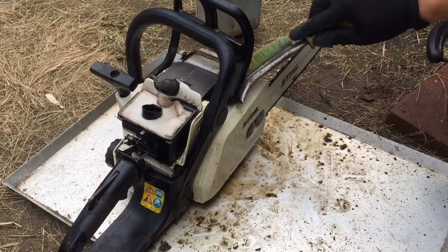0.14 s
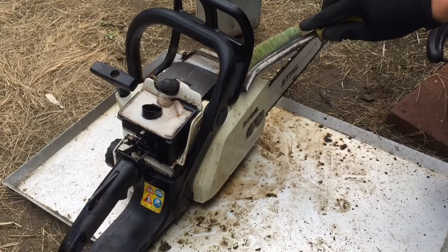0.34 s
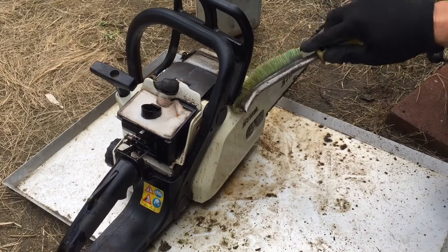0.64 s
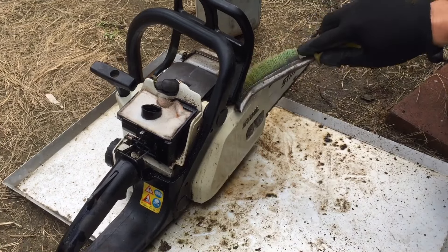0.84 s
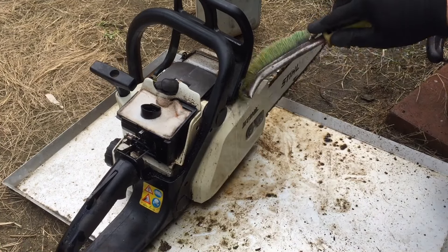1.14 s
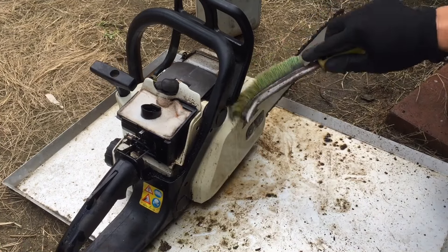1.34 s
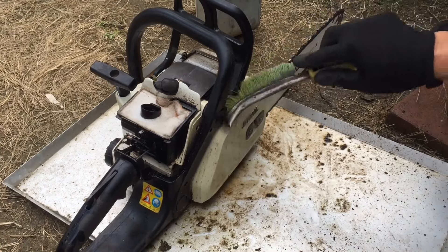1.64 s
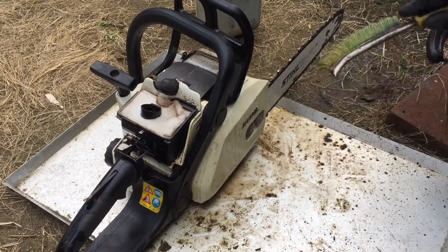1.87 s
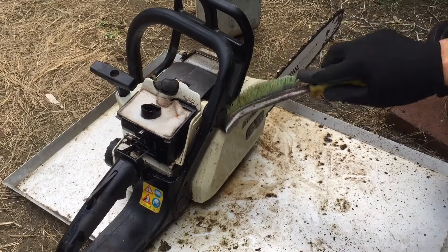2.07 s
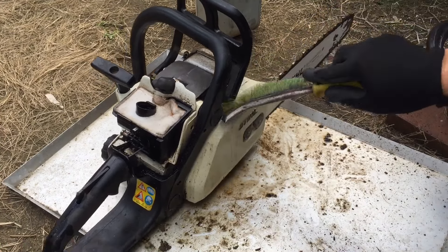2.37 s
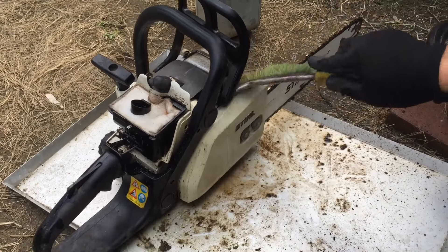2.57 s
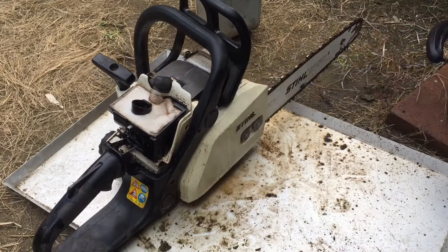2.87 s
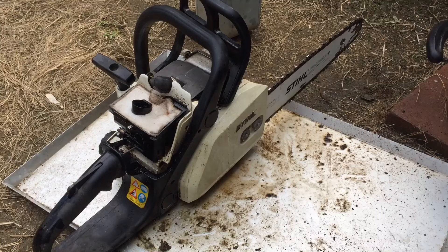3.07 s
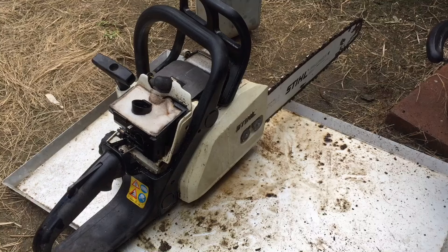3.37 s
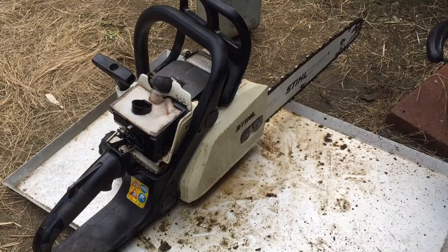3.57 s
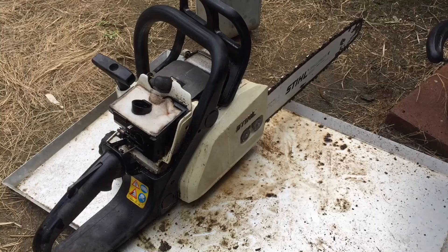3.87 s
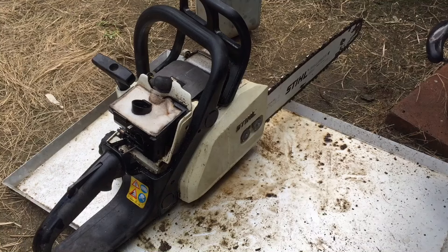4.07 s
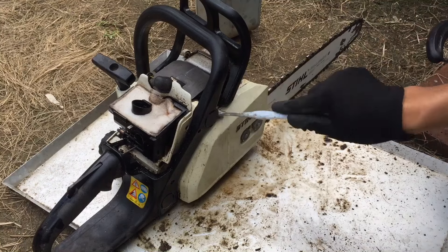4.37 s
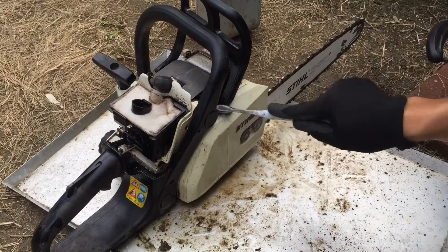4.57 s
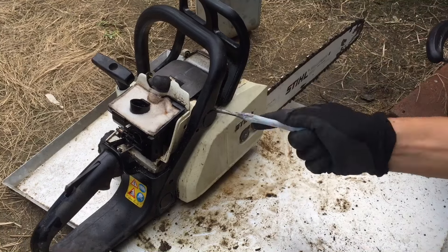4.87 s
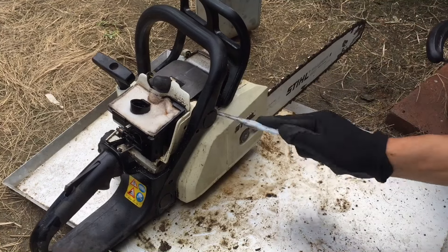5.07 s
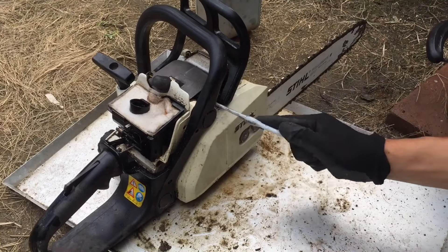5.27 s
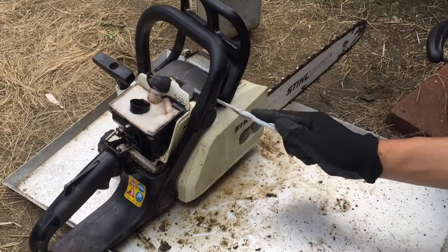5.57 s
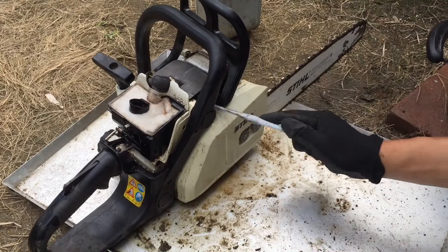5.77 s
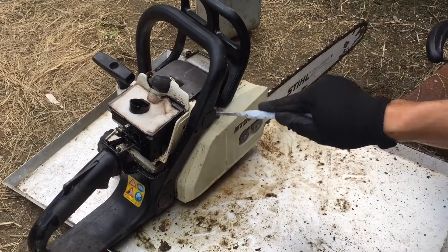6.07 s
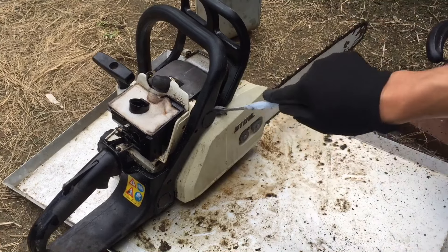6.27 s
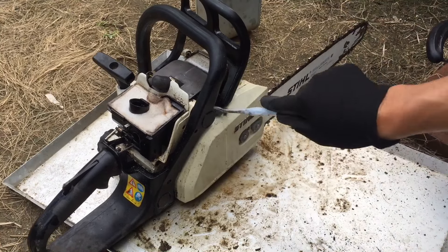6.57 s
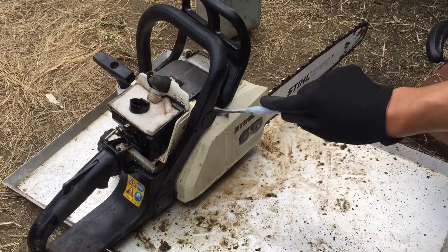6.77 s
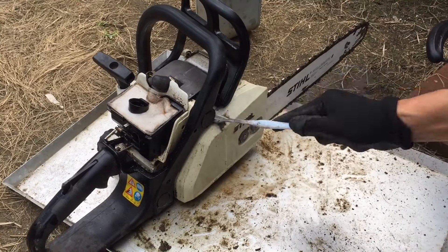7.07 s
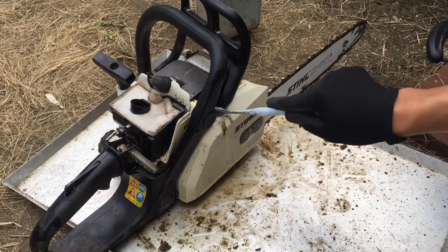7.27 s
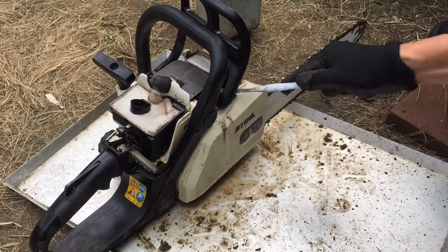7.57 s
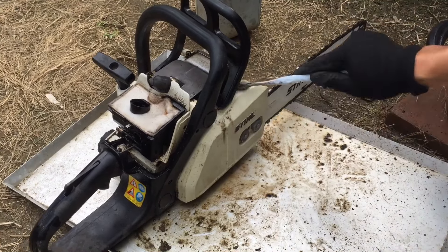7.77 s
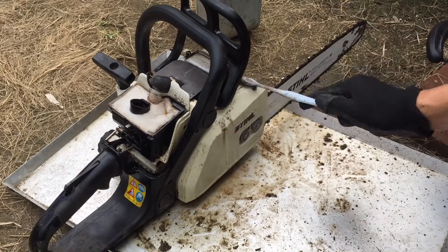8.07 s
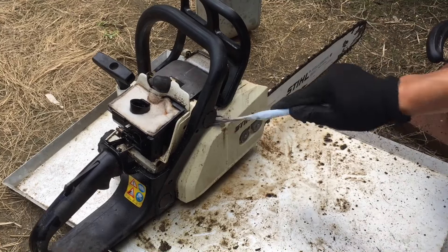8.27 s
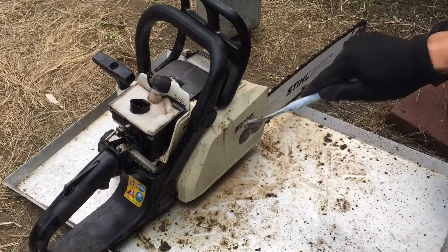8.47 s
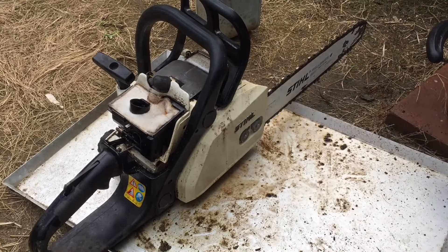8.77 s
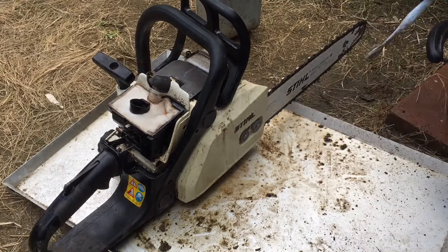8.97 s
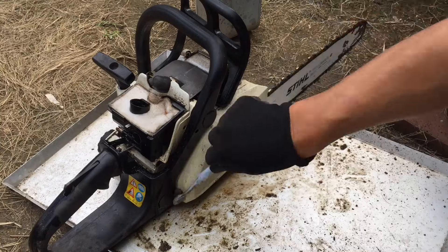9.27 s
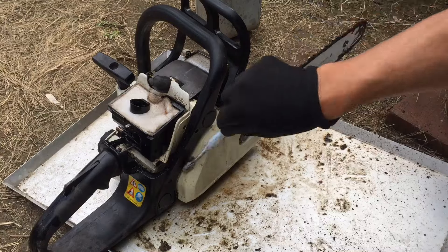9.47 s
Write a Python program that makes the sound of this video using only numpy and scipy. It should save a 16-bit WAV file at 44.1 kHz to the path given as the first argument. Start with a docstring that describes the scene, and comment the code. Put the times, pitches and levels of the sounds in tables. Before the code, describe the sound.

A stiff brush scrubs a hollow plastic cover in quick strokes, is put down with a clack, then a smaller brush scratches and clinks on steel.

```python
"""Two brushes scrub the side cover and bar root of a stopped chainsaw, over quiet air and a faint far drone.
At first one brush swishes to and fro, around 15 sweeps a second: showers of clicks excite the cover's modes.
Its head knocks on the hollow plastic, with a small squeak and soft low bumps; then it is put down with a clack.
The second, smaller brush then scrubs, squeaks and clinks on steel: blows are decaying modes and a noise crack.
The clinks cease, and scrubbing, knocks and bumps go on to the end, with one more clack."""
import sys
import numpy as np
from scipy import signal
from scipy.fft import rfft, irfft, next_fast_len
from scipy.io import wavfile
from scipy.ndimage import uniform_filter1d

SR = 44100
rng = np.random.default_rng(int(sys.argv[2]) if len(sys.argv) > 2 else 0)


def dump(signal):
    """Clip the signal to [-1, 1] and save it as 16-bit WAV at the path in sys.argv[1]."""
    limited = np.clip(np.atleast_2d(signal).T, -1, 1)
    pcm = np.round(limited * 32767).astype(np.int16)
    wavfile.write(sys.argv[1], SR, pcm)


N = 424683  # length in samples

# Outdoor air. Each row: frequency in Hz, relative spectral level in dB.
AIR_SPECTRUM = [(25, -48), (45, -40), (75, -17.5), (130, -6), (200, -14), (330, -21.5), (700, -25.5),
                (1800, -27.5), (4000, -31.5), (9000, -34.5), (15500, -39)]
AIR_DB = -67
# Far drone. Each row: mean frequency in Hz, mean level in dB.
DRONE = [(113, -82), (140, -70.5)]
# Brush head on the cover. Each row: start in seconds, level in dB, hollow bass and sharp tick in dB
# relative to that level.
KNOCKS = [(0.046, -31, -12, -20), (0.0566, -34.5, -24, -12), (0.0693, -36, -32, -8), (0.0846, -28, -7, -12),
          (0.2156, -44, -13, -12), (0.4693, -34, -11, -3), (0.5181, -43, 1, -3), (0.8802, -42, -1, -7.5),
          (0.9028, -39.5, 5, -9.5), (1.2715, -31.5, 1.5, -9), (1.409, -43.5, -12.5, -6),
          (2.1763, -42.5, 3, -21), (2.2115, -42, -5.5, -10), (2.3958, -36.5, -16, -2.5),
          (2.6357, -30, -11, -17.5), (2.6565, -32.5, -2, -24), (2.7036, -38.5, -5, -10.5),
          (2.7197, -27.5, -11, -9), (2.7372, -38.5, -11, -11), (4.5385, -47, -27, -4),
          (4.5794, -44, -19, -10), (4.591, -43.5, -21, -0.5), (4.6042, -40, -5.5, 3),
          (4.621, -47.5, -5, -28), (4.6638, -41.5, -35, -1), (4.755, -45, -6.5, -8),
          (4.885, -43.5, -17, -6.5), (4.9673, -48.5, -27, -14), (5.331, -54, -22, -18),
          (5.4385, -36, -6, -7), (5.539, -54, -24, -8), (5.7914, -49.5, 7, -2), (5.8512, -43, -37, 1.5),
          (5.9182, -38, -14, -0.5), (6.0258, -50.5, -6, -30), (6.0543, -42.5, -44, -3),
          (6.1384, -52.5, -17, 5.5), (6.2046, -40, -45, -3.5), (6.7372, -40, -7.5, -34),
          (6.8259, -38, -26, -3), (6.8782, -48.5, 1, -23), (7.1518, -44.5, -2.5, -27),
          (7.22, -34, -12, 1.5), (7.2519, -51.5, -32, 16), (7.4113, -53, 9, 3),
          (7.5146, -26.5, -16.5, -7.5), (7.5426, -38, -24, -3), (7.7365, -34.5, -35, -10),
          (7.806, -47.5, -27, -27), (7.836, -43, -8.5, -4), (8.0271, -40, -8.5, 1),
          (8.1012, -54, -28.5, 7.5), (8.1608, -62, -8, 12.5), (8.521, -45.5, 8.5, 4.5)]
# Modes of the plastic cover. Each row: frequency in Hz, mean strength in dB, time to fall 60 dB in seconds.
COVER_MODES = [(667, -16, 0.067), (1012, -5, 0.028), (1052, 5, 0.039), (1150, -11.5, 0.02215),
               (1648, 2, 0.04), (1800, 7, 0.026), (1916, -2, 0.043), (2064, 4.5, 0.033), (2180, -5.5, .025),
               (2472, 0, 0.05), (2947, -3.5, 0.036), (3314, -2.5, 0.039), (3756, -0.5, 0.017),
               (4240, -7.5, 0.036), (4960, -11, 0.024), (5890, -20.5, 0.065), (6950, -21, 0.016)]
# Dense crack of a blow on the cover. Each row: frequency in Hz, relative spectral level in dB.
COVER_CRACK = [(100, -36), (400, -24), (750, -17), (1050, 11), (1400, -1.5), (1900, 6), (3200, -2.5),
               (5500, -10.5), (8000, -17), (12000, -19.5), (16000, -21.5)]
# Bouts of even scrubbing. Each row: start in seconds, end in seconds, number of sweeps, share of each sweep
# in contact, pressure on the cover at the start in dB, the same at the end in dB, bristle hiss in dB.
SCRUBS = [(0.102, 0.298, 3, 0.57, -49, -52, -48.5), (0.301, 0.402, 2, 0.51, -59.5, -64, -54.5),
          (0.489, 0.732, 3, 0.49, -45, -58.5, -51.5), (0.81, 0.914, 2, 0.62, -65.5, -57.5, -57.5),
          (0.94, 1.143, 4, 0.45, -48.5, -65, -48), (1.222, 1.562, 7, 0.58, -61, -60.5, -54.5),
          (1.569, 1.74, 2, 0.26, -76, -60, -53.5), (1.754, 1.838, 1, .38, -56.5, -56.5, -41.5),
          (2.13, 2.303, 2, 0.62, -66.5, -38, -54), (2.339, 2.48, 3, 0.93, -47.5, -57, -60),
          (2.507, 2.66, 3, 1, -42, -68, -55.5), (4.447, 4.764, 5, 0.58, -56, -54, -63.5),
          (4.77, 4.89, 2, .7, -62, -66, -63), (4.904, 5.111, 3, 0.55, -52.5, -69.5, -62),
          (5.255, 5.315, 1, .55, -57, -57, -53), (5.637, 5.791, 3, .8, -66, -62.5, -61.5),
          (6.032, 6.377, 5, 0.72, -68.5, -53, -62), (6.434, 6.937, 7, 0.52, -55, -44, -53),
          (6.947, 7.215, 4, .5, -44, -49.5, -54), (7.215, 7.43, 3, .85, -53, -52, -56.5),
          (7.435, 7.53, 2, .7, -44, -44, -51), (7.644, 8.025, 6, 0.53, -55.5, -47.5, -59),
          (8.169, 8.253, 1, 0.36, -63, -66, -61.5), (8.323, 8.457, 3, 0.58, -60, -62, -78),
          (8.476, 8.56, 2, 0.57, -45.5, -44, -57), (8.866, 8.936, 1, 0.43, -50.5, -47, -50.5),
          (9.239, 9.369, 3, 0.98, -69.5, -46, -45), (9.412, 9.563, 3, 1, -53, -60, -43.5),
          (9.569, 9.62, 1, 0.49, -67, -67, -46.5)]
# Broad rasp of bristles on the cover. Each row: frequency in Hz, relative spectral level in dB.
RASP_SPECTRUM = [(200, -32.5), (500, -20), (800, -13), (1050, 8), (1420, -11), (1900, -2.5), (2700, -17),
                 (3500, -10), (5000, -12), (8000, -26.5)]
# The bristles' own hiss. Each row: frequency in Hz, relative spectral level in dB.
HISS_SPECTRUM = [(1500, -38), (3000, -3.5), (4200, 2), (5600, 0.5), (7000, 3.5), (9000, 2), (11000, 4.5),
                 (12800, 3.5), (14200, 2), (15600, 2.5), (16200, -28.5)]
# Squeaks under the dragged brush. Each row: start in seconds, end in seconds, mean pitch in Hz, level in dB.
SQUEAKS = [(5.675, 5.735, 6250, -54), (5.678, 5.74, 2450, -55), (5.644, 5.658, 3500, -52.5),
           (.485, 0.613, 770, -63)]
# Dull bumps while the hand moves. Each row: middle in seconds, length in seconds, level in dB.
BUMPS = [(0.854, 0.043, -56.5), (1.269, 0.022, -44.5), (1.681, 0.013, -36), (2.145, 0.12, -46.5),
         (2.325, 0.092, -47), (3.084, 0.039, -60), (4.658, 0.078, -51), (5.008, 0.031, -53.5),
         (5.141, 0.033, -54.5), (7.266, 0.029, -57), (8.417, 0.031, -51.5), (9.1, 0.025, -57),
         (9.205, 0.021, -52), (9.463, 0.026, -49), (9.557, 0.02, -49)]
# Low thud of a bump. Each row: frequency in Hz, relative spectral level in dB.
THUD_SPECTRUM = [(30, -36), (60, -14), (110, 6.5), (180, -1), (320, -16), (500, -41), (1500, -62.5)]
# Tools put down, picked up and nudged. Each row: start in seconds, level in dB, treble in dB relative to it,
# number of bounces (rounded in use).
CLACKS = [(2.9031, -36, 4, 0), (3.0485, -61, 14, 0), (3.081, -37.5, 2, 5.5), (3.334, -58, -9, 0),
          (3.3937, -59, 2, 1), (3.7114, -67.5, 5, 0), (3.9034, -49, -8, 0.5), (3.9364, -41, -0.5, 1),
          (8.689, -62.5, -12, 0), (9.0003, -41.5, 7, 0)]
# Modes of the tools and what they lie on. Each row: frequency in Hz, mean strength in dB,
# time to fall 60 dB in seconds.
TOOL_MODES = [(362, -12, 0.14), (457, -21.5, 0.049), (669, -2, 0.075), (735, -10.5, 0.098),
              (1050, -5.5, 0.075), (1424, -0.5, 0.079), (1620, 4, 0.035), (1940, 7, 0.031),
              (2810, -3, 0.067), (4550, 2.5, 0.039), (5460, -3.5, 0.075), (6980, 2.5, 0.052),
              (8500, -14, .05), (11800, -1, 0.037), (14100, -13, 0.037)]
# Dense crack of tools in contact. Each row: frequency in Hz, relative spectral level in dB.
TOOL_CRACK = [(120, -37), (350, 4.5), (800, 3.5), (1700, -4), (2400, -3.5), (5000, 2), (9000, 0),
              (13000, 4.5), (16500, -11)]
# Spells of loose grit and light touches while the brushes are changed and the small one is poked about.
# Each row: middle in seconds, length in seconds, level in dB before the common gain in fumbling().
FUMBLES = [(3.16, 0.23, -63.5), (3.65, .45, -69.5), (4.653, 0.38, -56.5), (5.15, 0.42, -59),
           (5.972, 0.4, -60), (8.68, 0.24, -87.5)]
# Small brush on steel. Each row: start in seconds, level in dB, treble in dB relative to it,
# pitch as a factor (below 1 while the brush stays pressed on).
CLINKS = [(4.3919, -46, -5, 0.99), (5.0079, -35, 3.5, 0.96), (5.0225, -41.5, -1, 0.94),
          (5.1168, -26, 7.5, .96), (5.1197, -33, 6, 0.97), (5.2062, -33.5, -2, .92),
          (5.3411, -62, 15.5, .92), (5.3948, -37.5, 5.5, .9), (5.4299, -30, 5, 0.88),
          (5.4385, -29, 5, 0.99), (5.780, -35, 3.5, 0.79), (5.786, -28, 3.5, 0.87), (5.7913, -28, 11.5, 1),
          (5.8496, -39, -6, .89), (5.9067, -28, 0.5, 0.99)]
# Modes of the steel, before that pitch factor. Each row: frequency in Hz, mean strength in dB,
# time to fall 60 dB in seconds.
STEEL_MODES = [(4320, -19, 0.036), (6000, -16, .04), (6560, -13.5, 0.03), (7250, -2.5, 0.048),
               (10100, -16, 0.043), (11100, -16, .04), (12200, -14.5, 0.059), (12330, -9.5, .035),
               (12190, -11.5, 0.037), (12800, -10, .035), (12830, 7.5, 0.02), (12500, -10.5, .04),
               (14420, -22, .05)]
# Dense crack of a blow on steel. Each row: frequency in Hz, relative spectral level in dB.
STEEL_CRACK = [(200, -36), (900, -22.5), (1800, -11), (4000, -10.5), (6500, -10), (8200, -9), (12500, 3),
               (14500, -10.5), (16500, -11)]
# Sound scattered back outdoors. Each row: frequency in Hz, relative spectral level in dB.
SCATTER_SPECTRUM = [(200, 4.5), (2500, 4.5), (8000, -6), (16000, -8.5)]

CATCH_SHARE = 0.37  # chance that the brush catches on an edge in a sweep and taps the cover
CATCH_DB, CATCH_SPREAD_DB = 2, 7  # mean level of a tap over the pressure of its sweep; greatest deviation
CATCH_BASS_DB, CATCH_TICK_DB = -7.5, -11  # hollow bass and sharp tick of a tap, relative
STUTTER_DB, STUTTER_PER_S = 4, 100  # stick-slip makes the pressure within a sweep uneven
DRAG_DB = -17  # light dragging while the hand turns between sweeps
BOUNCE_S, BOUNCE_SHRINK = .058, .56  # first hop in seconds; each later hop as a share of the one before
LANDING_DB, BOUNCE_DB, BOUNCE_TREBLE_DB = -11.5, -2, -7.5  # loss at bounces, more per hop, change of treble
EDGE_HZ = 16300  # upper band limit


def amp(db):
    """Level: decibels to amplitude gain."""
    return 10 ** (np.asarray(db) / 20)


def unit(x):
    """Normalisation: scales to rms 1."""
    return x / np.sqrt(np.mean(x ** 2) + 1e-20)


def struck(x):
    """Normalisation of a transient: scales to rms 1 over its first 8 ms."""
    return x / np.sqrt(np.mean(x[:round(.008 * SR)] ** 2) + 1e-20)


def add(mix, s, sound):
    """Superposition: adds a sound to the mix at time s."""
    part = mix[max(round(s * SR), 0):][:len(sound)]
    part += sound[:len(part)]


def colour(x, spectrum):
    """Linear filtering: shapes x by (Hz, dB) points and scales to rms 1."""
    hz, db = np.transpose(spectrum)
    size = next_fast_len(len(x))
    f = np.fft.rfftfreq(size, 1 / SR)
    gain = amp(np.interp(np.log(f + 1), np.log(hz), db))
    return unit(irfft(rfft(x, size) * gain, size)[:len(x)])


def drift(rate):
    """Slow random modulation: joins random values, rate of them a second, by straight lines; rms 1."""
    steps = rng.standard_normal(20000)
    return unit(np.interp(np.arange(N) * rate / SR, np.arange(len(steps)), steps))


def ring(modes, t, scatter_db, detune):
    """Modal vibration: decaying sines whose strength and pitch vary with the place of contact."""
    hz, db, t60 = np.transpose(modes)[:, :, None]
    strength, shift, phase = rng.standard_normal((3, len(modes), 1))
    waves = np.sin(2 * np.pi * (hz * (1 + detune * shift) * t + phase))
    decay = amp(db + scatter_db * strength - 60 * t / t60)
    return (decay * waves).sum(0)


def blow(modes, crack, splits_hz, levels_db, crack_db, crack_t60, tail_db, tail_t60, detune, rise):
    """Impact excitation: modes, a short crack and a weak scattered tail, weighted by register."""
    t = np.arange(SR // 6) / SR
    dying = amp(-60 * t / crack_t60) + amp(tail_db - 60 * t / tail_t60)
    burst = struck(colour(rng.standard_normal(len(t)), crack) * dying)
    modal = struck(ring(modes, t, scatter_db=1.5, detune=detune))
    rest = (modal + amp(crack_db) * burst) * (1 - np.exp(-t / rise))
    out = 0
    for hz, db in zip(splits_hz, levels_db):
        # each filter is applied twice, for a steep crossover
        low_pass, high_pass = (np.tile(signal.butter(2, hz, kind, fs=SR, output="sos"), (2, 1))
                               for kind in ("low", "high"))
        out = out + amp(db) * struck(signal.sosfilt(low_pass, rest))
        rest = signal.sosfilt(high_pass, rest)
    return out + amp(levels_db[-1]) * struck(rest)


def flicks(per_s, spread_db):
    """Random impulses: bristle tips catch and let go, as clicks of uneven size and either sign."""
    size = amp(spread_db * np.minimum(rng.exponential(1, N), 4))
    sign = rng.choice([-1, 1], N)
    return unit(size * sign * (rng.random(N) < per_s / SR))


def grit(per_s, spread_db, low_hz, high_hz, cycles):
    """Short resonances: specks of dirt snap one by one, each decaying over a few cycles of its own pitch."""
    t = np.arange(SR // 40) / SR
    count = 24
    kind = rng.integers(0, count, N)
    snaps = flicks(per_s, spread_db)
    out = np.zeros(N)
    for k, hz in enumerate(np.geomspace(low_hz, high_hz, count)):
        rough_tone = np.sin(2 * np.pi * hz * t) + .5 * rng.standard_normal(len(t))
        speck = np.exp(-hz * t / cycles) * rough_tone
        out += signal.oaconvolve(snaps * (kind == k), speck)[:N]
    return unit(out)


def patchy(x, depth_db, frames, bins):
    """Time-varying filtering: the colour of x shifts at random from moment to moment."""
    z = signal.stft(x, nperseg=256)[2]
    patches = uniform_filter1d(rng.standard_normal(z.shape), bins, axis=0)
    patches = unit(uniform_filter1d(patches, frames, axis=1))
    return signal.istft(z * unit(amp(depth_db * patches)), nperseg=256)[1][:N]


def outdoors(waver_hz=5, waver_db=3.5):
    """Frequency and amplitude modulation: a far drone wavers in pitch and level within filtered air noise."""
    air = amp(AIR_DB + .8 * drift(rate=3)) * colour(rng.standard_normal(N), AIR_SPECTRUM)
    for hz, db in DRONE:
        turns = np.cumsum(hz + waver_hz * drift(rate=10)) / SR
        level = amp(db + waver_db * drift(rate=5.5))
        air += level * np.sqrt(2) * np.sin(2 * np.pi * turns)
    return air


def sweeps():
    """Periodic motion: an even beat per bout, pressure in dB rising or easing; gives (s, length s, dB, hiss dB)."""
    for start, end, count, contact, first_db, last_db, hiss_db in SCRUBS:
        period = (end - start) / count
        for along in (np.arange(count) + .5) / count:
            middle = start + along * (end - start)
            yield middle, contact * period, first_db + along * (last_db - first_db), hiss_db


def catches():
    """Obstructed motion: at random the brush catches in a sweep, a knock that follows the pressure."""
    strokes = list(sweeps())
    chance = rng.uniform(0, 1, (len(strokes), 3))
    taps = []
    for (s, length, db, _), (luck, when, force) in zip(strokes, chance):
        if luck < CATCH_SHARE:
            tap_db = db + CATCH_DB + CATCH_SPREAD_DB * (2 * force - 1)
            taps.append((s + (when - .5) * length, tap_db, CATCH_BASS_DB, CATCH_TICK_DB))
    return taps


def knocks(hardness=.4, low_mid_db=-4, high_mid_db=-3):
    """Contact stiffness: short woody blows on hollow plastic; a sharper contact moves weight upward."""
    out = np.zeros(N)
    for s, db, bass_db, tick_db in list(KNOCKS) + catches():
        tilt_db = hardness * tick_db / 2
        levels_db = db + np.array([bass_db, low_mid_db - tilt_db, high_mid_db + tilt_db, tick_db])
        add(out, s, blow(COVER_MODES, COVER_CRACK, [1400, 2700, 5000], levels_db, crack_db=8, crack_t60=.012,
                         tail_db=-25, tail_t60=.058, detune=.024, rise=.0021))
    return out


def bristles(rasp_db=-6, ring_db=-2, grit_db=-9, crackle_db=-4, bluntness=1.93):
    """Friction as many small impacts: each sweep showers the cover, which rasps and rings; bristles hiss."""
    t = np.arange(N) / SR
    pressure, speed = np.zeros((2, N))  # both as power
    for s, length, db, swish_db in sweeps():
        near = slice(*np.searchsorted(t, [s - 2 * length, s + 2 * length]))
        away = abs(t[near] - s) / length
        contact = np.exp(-(2 * away) ** bluntness)
        drag = amp(DRAG_DB) * np.exp(-(away / 2) ** 2) * np.hanning(len(away))
        sweep = np.maximum(contact, drag)
        pressure[near] += (sweep * amp(db)) ** 2
        speed[near] += (sweep * amp(swish_db)) ** 2
    pressure = pressure * unit(amp(STUTTER_DB * drift(rate=STUTTER_PER_S))) ** 2
    # countless fine tips blend into a hiss; caked dirt adds coarser grains on the cover
    tips = flicks(per_s=22000, spread_db=2)
    drive = (tips + amp(grit_db) * flicks(per_s=96, spread_db=7)) * np.sqrt(pressure)
    cover = np.zeros(N)
    place = drift(rate=8)
    for k in range(4):  # the brush wanders among four places that ring a little differently
        answer = ring(COVER_MODES, t[:SR // 10], scatter_db=2, detune=.013)
        share = np.cos(place + k * np.pi / 4) / np.sqrt(2)
        cover += signal.oaconvolve(drive * share, answer / np.linalg.norm(answer))[:N]
    rasp = colour(drive, RASP_SPECTRUM) * np.std(drive)
    # bending bristles shift the colour of both layers
    body = patchy(amp(ring_db) * cover + amp(rasp_db) * rasp, depth_db=3.5, frames=6, bins=4)
    hiss = patchy(colour(tips, HISS_SPECTRUM), depth_db=6, frames=10, bins=12)
    crackle = amp(crackle_db) * grit(per_s=480, spread_db=4, low_hz=1500, high_hz=7000, cycles=3)
    return body + crackle * np.sqrt(pressure) + hiss * np.sqrt(speed)


def squeaks():
    """Stick-slip oscillation: brief tones, rough in pitch and level."""
    out = np.zeros(N)
    for start, end, hz, db in SQUEAKS:
        count = max(round((end - start) * SR), 8)
        turns = np.cumsum(hz * (1 + .035 * drift(rate=1800)[:count])) / SR
        grip = unit(amp(5 * drift(rate=700)[:count]))
        tone = np.sqrt(2) * np.sin(2 * np.pi * turns)
        add(out, start, amp(db) * np.hanning(count) * grip * tone)
    return out


def bumps():
    """Band-limited transients: soft low swells of filtered noise under a bell-shaped envelope."""
    out = np.zeros(N)
    t = np.arange(SR // 4) / SR
    for s, length, db in BUMPS:
        swell = np.exp(-(2 * (t - t.mean()) / length) ** 2)
        thud = colour(rng.standard_normal(len(t)), THUD_SPECTRUM) * swell
        thud *= np.linalg.norm(swell) / np.linalg.norm(thud)
        add(out, s - t.mean(), amp(db) * thud)
    return out


def landings():
    """Inelastic bouncing: hops ever quicker and fainter; gives (s, level dB, treble dB) of each contact."""
    for s, db, treble_db, bounces in CLACKS:
        yield s, db, treble_db
        for hop in range(round(bounces)):
            s = s + BOUNCE_S * BOUNCE_SHRINK ** hop
            yield s, db + LANDING_DB + BOUNCE_DB * (hop + 1), treble_db + BOUNCE_TREBLE_DB


def clacks():
    """Repeated impact: tools put down, picked up or nudged ring in their modes at each contact."""
    out = np.zeros(N)
    contacts = list(landings())
    poses = rng.uniform(.94, 1.06, len(contacts))
    for (s, db, treble_db), pose in zip(contacts, poses):
        modes = np.array(TOOL_MODES) * [pose, 1, 1]  # each landing rings at a slightly different pitch
        add(out, s, blow(modes, TOOL_CRACK, [5000], [db, db + treble_db], crack_db=2, crack_t60=.014,
                         tail_db=-12, tail_t60=.086, detune=.01, rise=.00024))
    return out


def fumbling(level_db=-2):
    """Clustered random impulses: small ticks and scratches come in irregular bunches within each spell."""
    t = np.arange(N) / SR
    spells = sum(amp(db) * np.exp(-(2 * (t - s) / length) ** 2) for s, length, db in FUMBLES)
    ticks = grit(per_s=200, spread_db=3.5, low_hz=1200, high_hz=5000, cycles=4)
    bunches = unit(amp(5 * drift(rate=45)))
    return amp(level_db) * ticks * bunches * spells


def clinks(damping=6):
    """Loading and damping: struck steel rings near 7 and 13 kHz; a pressed brush lowers and shortens it."""
    out = np.zeros(N)
    for s, db, treble_db, pitch in CLINKS:
        modes = np.array(STEEL_MODES) * [pitch, 1, pitch ** damping]
        add(out, s, blow(modes, STEEL_CRACK, [8300], [db, db + treble_db], crack_db=-3, crack_t60=.018,
                         tail_db=-26, tail_t60=.14, detune=.0018, rise=.00023))
    return out


def yard(x, echo_db=-26, t60=.14):
    """Diffuse reflection: the ground and nearby things scatter a little sound back after 5 ms."""
    t = np.arange(SR // 3) / SR
    tail = rng.standard_normal(len(t)) * amp(-60 * t / t60) * (t > .005)
    tail = colour(tail, SCATTER_SPECTRUM)
    return x + amp(echo_db) * signal.oaconvolve(x, tail / np.linalg.norm(tail))[:N]


def scene():
    """Superposition of sources: the work on the saw with its scattered sound, the bumps and the air."""
    work = bristles() + knocks() + clinks() + squeaks() + clacks() + fumbling()
    return (yard(work) + bumps() + outdoors())[None]


def record(dry):
    """Band limiting: the small microphone loses the deep bass, and a low-pass removes the extreme treble."""
    thin = signal.sosfilt(signal.butter(4, 52, "high", fs=SR, output="sos"), dry)
    low_pass = signal.firwin(255, EDGE_HZ, window=("kaiser", 9), fs=SR)
    return signal.oaconvolve(thin, low_pass[None], "same")


dry = scene()
out = record(dry)
dump(out)
```